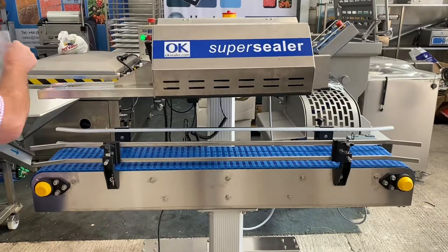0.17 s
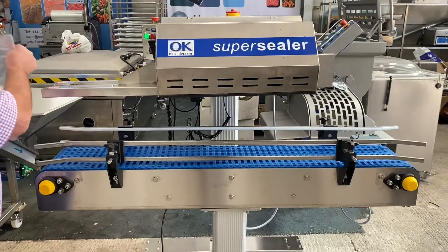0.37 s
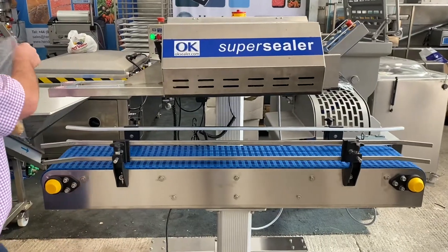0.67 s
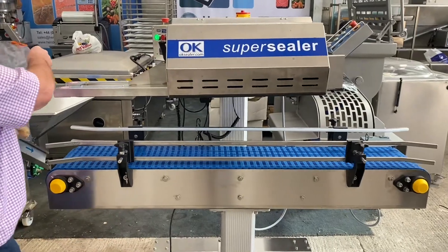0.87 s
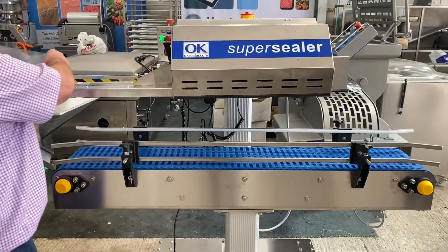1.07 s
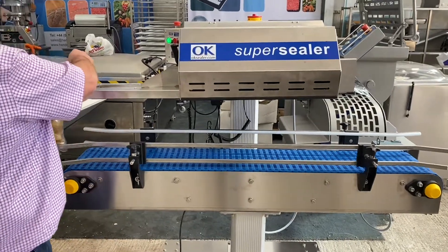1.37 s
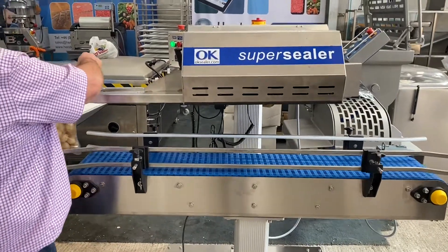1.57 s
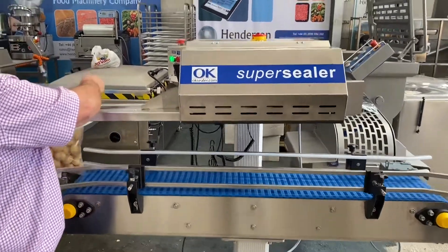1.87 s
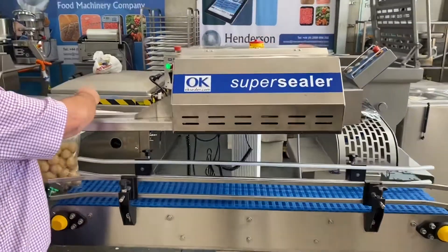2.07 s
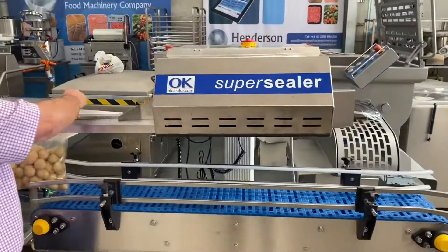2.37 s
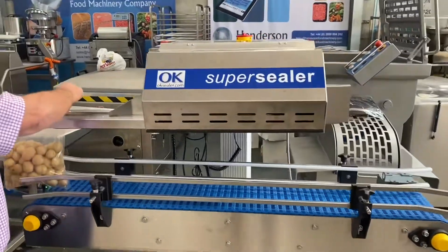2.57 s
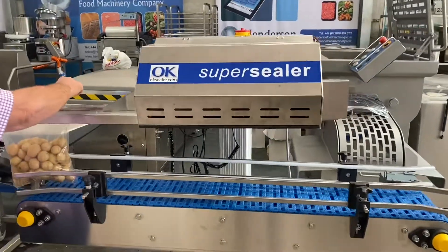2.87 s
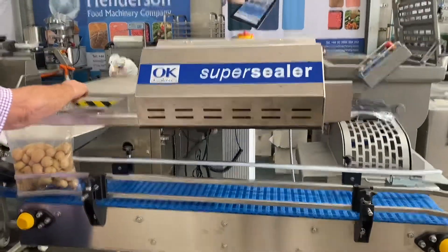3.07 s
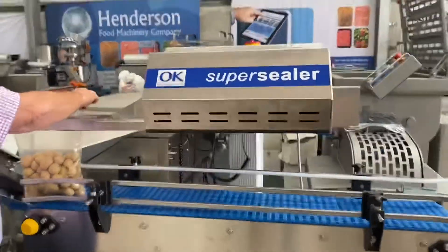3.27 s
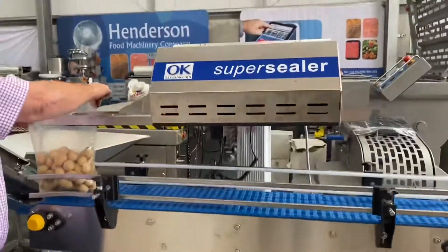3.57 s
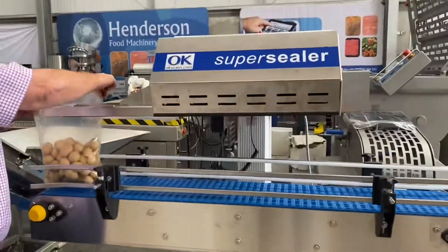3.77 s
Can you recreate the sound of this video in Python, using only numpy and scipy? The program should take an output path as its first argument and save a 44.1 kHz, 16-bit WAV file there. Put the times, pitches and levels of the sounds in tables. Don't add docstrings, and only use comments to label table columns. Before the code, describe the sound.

A bag sealing machine and conveyor hum and whine steadily while a plastic bag crackles nearby

```python
import sys
import numpy as np
from scipy import signal
from scipy.fft import rfft, irfft, next_fast_len
from scipy.io import wavfile
from scipy.ndimage import uniform_filter1d, map_coordinates

SR = 44100
rng = np.random.default_rng(int(sys.argv[2]) if len(sys.argv) > 2 else 0)


def inscribe(sig):
    pcm = np.round(np.clip(np.atleast_2d(sig).T, -1, 1) * 32767)
    wavfile.write(sys.argv[1], SR, pcm.astype(np.int16))


def decibels_to_gain(level_db):
    exponent = np.asarray(level_db, float) / 20
    return 10 ** exponent


N = 172431

# t/s, level/dB
RUSH_LEVEL = [(0.0, -50), (2.66, -51.5), (3.9, -49.5)]
# f/Hz, density/dB
BELT_SPECTRUM = [(15, -50), (30, -27), (60, -7.5), (130, -9.5), (220, -0.5), (450, -4.5), (800, -3),
                 (1300, -24.5), (1900, -62)]
# f/Hz, density/dB
AIR_SPECTRUM = [(500, -11), (1000, -0.5), (4300, -10), (5200, -18), (7000, -22.5), (8200, -11.5),
                (10300, -31), (12100, -20.5), (13900, -34.5), (15800, -29)]
# f/Hz, likeness/0-1
PORT_LIKENESS = [(60, 0.54), (250, 0.98), (700, 0.56), (1500, 0.4), (3500, 0.36), (6500, 0.36), (9000, 1)]
# f/Hz, lead/rad
PORT_LEAD = [(100, -.3), (1000, .5), (1900, -.7), (3100, .9), (6500, 0), (8450, -3.1), (10200, -6.3),
             (12200, -9.4), (14000, -12.6), (15600, -15.7)]
# f/Hz, left over right/dB
PORT_BALANCE = [(100, -0.5), (300, -1), (650, -2), (950, -3.5), (1300, 0), (6000, -1.5)]

# t/s, peak level/dB, f/Hz, t60/s
BUMPS = [(0.196, -34, 110, 0.047), (0.233, -28, 93, 0.11), (0.233, -29.5, 210, 0.072),
         (0.236, -30.5, 320, 0.043), (0.272, -31.5, 89, 0.069), (0.326, -31, 120, 0.049),
         (0.341, -31, 74.4, 0.07), (.395, -29, 101, 0.11), (0.399, -29, 310, 0.041), (0.434, -37, 94, 0.13),
         (.495, -36, 222, .06), (0.531, -32, 85, 0.095), (.562, -32.5, 204, 0.089),
         (.59, -34.5, 283, 0.069), (.605, -34, 91.5, 0.056), (0.648, -41, 75, 0.087),
         (.802, -31.5, 249, 0.061), (.81, -40, 75, 0.065), (1.269, -44, 130, 0.072),
         (1.78, -44, 60.7, 0.06), (3.46, -47, 65, .1), (2.09, -35.5, 61.3, 0.11), (2.164, -35, 62.4, 0.088),
         (2.24, -45, 60, 0.15), (3.245, -37, 75.6, 0.067), (3.555, -41, 55.3, 0.11),
         (3.846, -30.5, 110, .07)]
# t/s, peak level/dB
RUBS = [(3.143, -39), (3.177, -45), (3.247, -33.5), (3.268, -43), (3.278, -42), (3.36, -42), (3.452, -41),
        (3.478, -46)]
# t/s, level/dB, f/Hz, t60/s, rise/s
TAP_MODES = [
    [(3.8142, 59.6, 613, .0115, .05), (3.815, -.6, 811, .005, .00024), (3.8153, -13, 1750, .005, .0003)],
    [(3.8139, 57.9, 609.5, .0116, .05), (3.8147, -5.4, 727, .0072, .00022)],
]
# t/s, level/dB, f/Hz, t60/s, rise/s, pitch sag/Hz, sag time/s
TAP_THUD = [
    (3.8167, -8.3, 95.7, .061, .00034, 456, .00264),
    (3.8163, -9.2, 90.2, .073, .00042, 440, .0032),
]

# t/s, peak level/dB
SNAPS = [(0.045, -41), (.1387, -35), (.1475, -27), (0.153, -39), (0.169, -41), (.23, -43), (0.2338, -32.5),
         (.2637, -47), (.3226, -43), (0.332, -34), (0.335, -29), (0.3459, -29), (0.3493, -33), (.3606, -44),
         (0.3645, -44), (0.3865, -27), (.4073, -39), (.417, -38), (0.5148, -28), (0.517, -35),
         (.5224, -21.5), (0.5261, -28), (0.53, -26), (.5368, -34), (.5482, -31), (0.567, -39), (0.573, -40),
         (0.6194, -37), (0.8094, -49), (1.5794, -40), (1.6257, -39), (1.6724, -37.5), (2.2694, -42),
         (2.3494, -46), (2.999, -33), (3.0205, -39), (3.0308, -35), (3.381, -36), (3.4027, -36),
         (3.49, -37)]
# t/s, level/dB
CRACKLE_LEVEL = [(0, -77), (.12, -70), (.15, -56), (.25, -48), (.3, -61), (.35, -47.5), (.42, -51.5),
                 (.5, -64), (.53, -56), (.58, -50), (.9, -69), (1.5, -71), (1.65, -58), (1.8, -71),
                 (2.9, -63.5), (3.02, -52.5), (3.1, -59), (3.4, -61)]
# f/Hz, response/dB
SNAP_SPECTRUM = [(710, -5), (1200, -12.5), (5790, -6.5), (10200, -12.5), (12000, -22), (14200, -19),
                 (15500, -26)]
# f/Hz, response/dB
CREASE_SPECTRUM = [(600, -36), (1500, 0.5), (2500, -2), (5000, -10), (11000, -20), (15800, -27)]
# t/s, level/dB, f/Hz, t60/s, rise/s
SNAP_RINGS = [
    (.126, -32.5, 2120, 0.048, .003),
    (3.0205, -32, 4700, 0.013, 0.00037),
    (3.03, -38, 4650, .012, 0.00045),
]

# f/Hz, level/dB
SHRILL_LINES = [(2898.4, -71), (7945.4, -56.5), (8058.4, -59)]
# t/s, gear mesh level/dB, inverter level/dB
SHRILL_FACING = [(0, -66, -64), (.3, -62, -65), (.6, -66, -66), (.88, -68, -66), (1.02, -57, -65),
                 (1.4, -61, -63), (1.8, -65, -63), (2.15, -67, -58), (2.45, -68, -62), (2.75, -68, -61),
                 (2.95, -59, -62), (3.2, -67, -57), (3.4, -58, -64), (3.6, -65, -60), (3.9, -64, -63)]

# f/Hz, level/dB, swell depth/0-1, swells along the path/1, swell start/turns
GEAR_MOTOR = [(181.1, -54, .1, 1, .55), (362.2, -56, .55, .99, .2), (724.5, -57, .2, .91, .48),
              (1265.7, -68, .5, 2.2, -.08), (1448.8, -63, .45, 1.4, -.34), (4347.8, -73, .28, 2.4, 0)]
FAN = [(311.7, -61.5, .3, 2.5, -.1), (468.5, -52.5, .55, 1.05, -.24), (624.5, -58, .3, .6, -.15),
       (781, -63, .2, .6, .1), (937, -63, .4, 1.1, .18)]
INVERTER_WHINE = [(3721.7, -74, .45, 1.01, .24), (4280.5, -68, .28, 2.1, -.15),
                  (7472.5, -77, .52, 1.01, .21), (7693.5, -78.5, .42, 2.2, -.07), (8001, -76, .25, 4, .24),
                  (8309, -79, .3, 2, .1), (8532.5, -80, .4, 1.2, .3), (11757, -81, .3, 2, .2),
                  (11951, -81, .4, 3, .7), (12250, -79, .3, 1.5, 0)]

BELT_DB, AIR_DB = 5, 0.5
BUMP_RISE = 0.27
RUB_HZ, RUB_T60, RUB_RISE_S, RUB_RIGHT = 594, 0.04, 0.0037, -0.14
GRAINS_PER_S, GRAIN_SPREAD_DB = 3000, 3.5
SNAP_T60, SNAP_RISE_S, SNAP_TINT = .006, .0003, .15
SNAP_DB, SNAP_ROOM_DB = 7.5, -2.5
UPPER_DB = -4.5
FLUTTER_DB, FLUTTER_RATE, PHASE_DRIFT = 0.8, 2.58, 0.16
TOP_HZ = 15800


def unit(x):
    return x / np.sqrt(np.mean(x ** 2) + 1e-20)


def along(points, hz):
    f, v = np.transpose(points)
    return np.interp(np.log(hz + 1), np.log(f + 1), v)


def curve(rows):
    s, *columns = np.transpose(rows)
    t = np.arange(N) / SR
    return np.squeeze([np.interp(t, s, column) for column in columns])


def wobble(rate):
    return map_coordinates(rng.standard_normal(200), [np.arange(N) * rate / SR])


def filtered(x, response):
    m = next_fast_len(N + SR // 2)
    return irfft(rfft(x, m) * response(np.fft.rfftfreq(m, 1 / SR)), m)[..., :N]


def paired(two):
    def mix(hz):
        angle = np.arccos(np.clip(along(PORT_LIKENESS, hz), -1, 1)) / 2
        return np.array([np.cos(angle), np.sin(angle)])

    def lead(hz):
        return np.exp(.5j * np.outer([1, -1], along(PORT_LEAD, hz)))

    mid, side = filtered(two, mix)
    return filtered(np.array([mid + side, mid - side]), lead)


def rush(spectrum, patchy_db):
    z = signal.stft(rng.standard_normal((2, N)), nperseg=512)[2]
    field = uniform_filter1d(rng.standard_normal(z.shape[1:]), size=6, axis=0)
    field = uniform_filter1d(field, size=10, axis=1)
    two = signal.istft(z * decibels_to_gain(patchy_db * unit(field)), nperseg=512)[1][:, :N]
    coloured = filtered(two, lambda hz: decibels_to_gain(along(spectrum, hz)))
    return unit(paired(coloured))


def add_ring(out, s, db, hz, t60, rise_s, sag_hz=0, sag_s=1):
    t = np.arange(SR // 8) / SR
    part = out[round(s * SR):][:len(t)]
    turns = hz * t + sag_hz * sag_s * (1 - np.exp(-t / sag_s))
    envelope = decibels_to_gain(db - 60 * t / t60) * (1 - np.exp(-t / abs(rise_s))) ** 2
    part += (envelope * np.sin(2 * np.pi * turns))[:len(part)]


def belts_and_air():
    level = curve(RUSH_LEVEL) + 0.32 * wobble(2.55)
    belts = decibels_to_gain(BELT_DB + .7 * wobble(9)) * rush(BELT_SPECTRUM, patchy_db=.8)
    air = decibels_to_gain(AIR_DB + 0.65 * wobble(14)) * rush(AIR_SPECTRUM, patchy_db=1.5)
    return decibels_to_gain(level) * (belts + air)


def handling():
    bumps, rubs, tap, thud = np.zeros(N), np.zeros(N), np.zeros((2, N)), np.zeros((2, N))
    for s, db, hz, t60 in BUMPS:
        add_ring(bumps, s, db + 6, hz, t60, BUMP_RISE / hz)
    for s, db in RUBS:
        add_ring(rubs, s, db + 18, RUB_HZ * decibels_to_gain(rng.normal(0, 0.58)), RUB_T60, RUB_RISE_S)
    for port in range(2):
        for mode in TAP_MODES[port]:
            add_ring(tap[port], *mode)
        add_ring(thud[port], *TAP_THUD[port])
    late = np.roll(bumps, 30)
    return np.array([late * 0.97, bumps]) + rubs * [[1], [RUB_RIGHT]] + tap - thud


def crease_bed():
    when, size, sign = rng.random((GRAINS_PER_S * 4, 3)).T
    grains = decibels_to_gain(-GRAIN_SPREAD_DB * np.log(size + 0.029)) * np.sign(sign - .5)
    creases = np.bincount((when * N).astype(int), grains, N)
    return unit(filtered(creases, lambda hz: decibels_to_gain(along(CREASE_SPECTRUM, hz)))) * decibels_to_gain(curve(CRACKLE_LEVEL))


def film_snaps():
    kicks, t = np.zeros(N), np.arange(SR // 50) / SR
    for s, db in SNAPS:
        colour = np.r_[1, SNAP_TINT * rng.standard_normal(size=9)]
        burst = unit(np.convolve(rng.standard_normal(len(t)), colour, "same"))
        envelope = decibels_to_gain(db + SNAP_DB - 60 * t / SNAP_T60) * (1 - np.exp(-t / SNAP_RISE_S))
        kicks[round(s * SR):][:len(t)] += envelope * burst
    return filtered(kicks, lambda hz: decibels_to_gain(along(SNAP_SPECTRUM, hz) + 5.5))


def bag():
    film = crease_bed() + film_snaps()
    for ring in SNAP_RINGS:
        add_ring(film, *ring)
    tail_t = np.arange(SR // 5) / SR
    tail = rng.standard_normal((2, SR // 5)) * decibels_to_gain(-60 * tail_t / 0.097)
    wet = signal.fftconvolve(film[None], tail / np.linalg.norm(tail[0]), axes=1)[:, :N]
    other = np.convolve(film, rng.standard_normal(size=24) / 5)[:N]
    return paired(np.array([film, other]) + decibels_to_gain(SNAP_ROOM_DB) * wet)


def shrill_whines():
    hz, db = np.transpose(SHRILL_LINES)[..., None]

    def wobbles(rate):
        return np.array([wobble(rate) for _ in hz])

    phase = 2 * np.pi * hz * np.arange(N) / SR + 0.43 * wobbles(6.38)
    facing_db = curve(SHRILL_FACING)[[0, 1, 1]] + [[0], [0], [UPPER_DB]]
    common = decibels_to_gain(facing_db + 0.63 * wobbles(9.06)) * np.sin(phase)
    opposed = decibels_to_gain(db + 1.6 * wobbles(3.36)) * np.cos(phase - .4)
    return np.sqrt(2) * np.array([common + opposed, common - opposed]).sum(axis=1)


def machine_tones():
    t, out = np.arange(N) / SR, np.zeros((2, N))
    for hz, db, depth, swells, start in GEAR_MOTOR + FAN + INVERTER_WHINE:
        swell = 1 + depth * np.cos(2 * np.pi * (swells * t * SR / N + start))
        size = np.sqrt(2) * decibels_to_gain(db) * swell
        phase = 2 * np.pi * (hz * t + rng.random())
        for port, side in enumerate((.5, -.5)):
            drift = PHASE_DRIFT * hz ** 0.076 * wobble(FLUTTER_RATE) / 2
            shift = side * along(PORT_LEAD, hz) + drift
            flutter = decibels_to_gain(FLUTTER_DB * wobble(FLUTTER_RATE))
            out[port] += size * flutter * np.sin(phase + shift)
    return out


def scene():
    def balance(hz):
        return decibels_to_gain(np.outer([.5, -.5], along(PORT_BALANCE, hz)))

    machines = filtered(belts_and_air() + machine_tones(), balance)
    return machines + handling() + bag() + shrill_whines()


def roll_off(x):
    return signal.sosfilt(signal.butter(12, 15890, fs=SR, output="sos"), x)


def record(dry):
    mix = filtered(dry, lambda hz: hz < TOP_HZ)
    return roll_off(mix)


dry = scene()
out = record(dry)
inscribe(out)
```